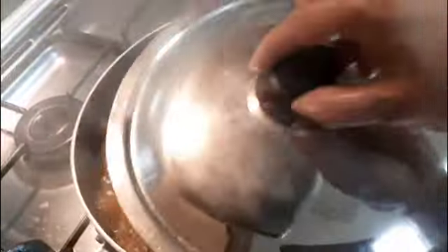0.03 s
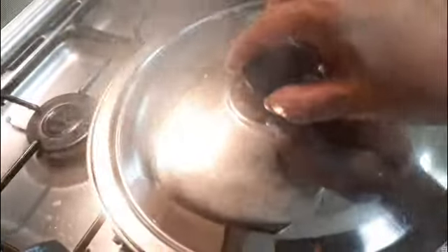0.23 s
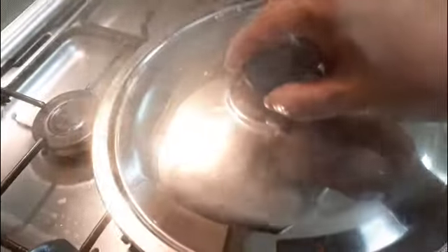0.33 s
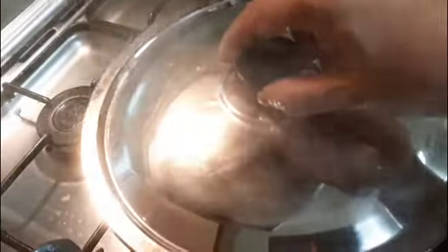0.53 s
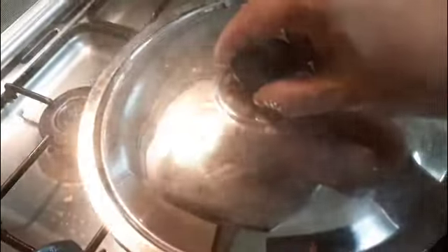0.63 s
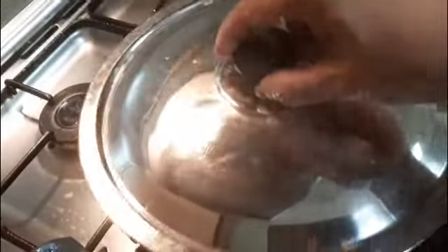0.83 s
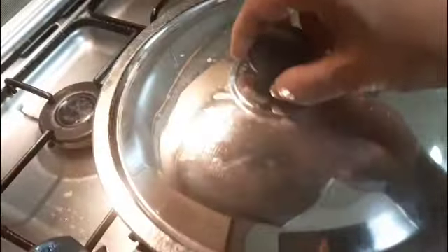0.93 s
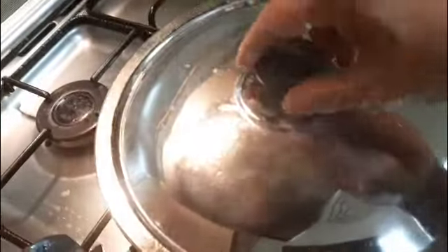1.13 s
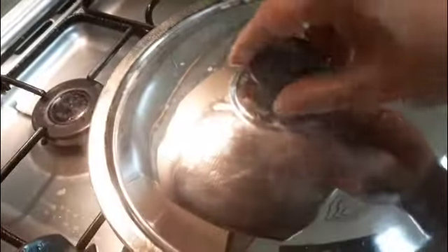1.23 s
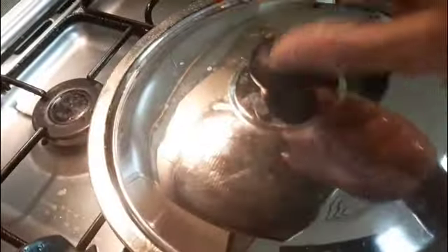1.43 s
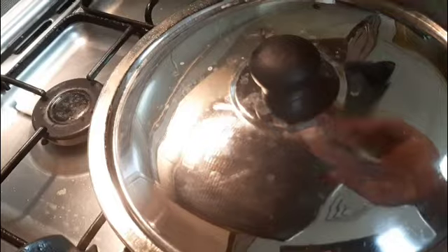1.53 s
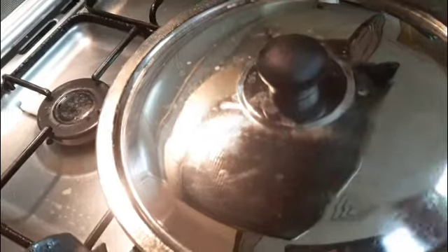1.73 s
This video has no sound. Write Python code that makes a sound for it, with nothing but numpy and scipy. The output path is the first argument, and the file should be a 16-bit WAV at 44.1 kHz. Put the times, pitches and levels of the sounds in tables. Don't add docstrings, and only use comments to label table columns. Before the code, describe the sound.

A steel-rimmed glass lid strikes a hissing, bubbling steel pot, chatters and rings briefly, muffling the hiss; after faint rubs it slides home with a lighter clank. Small kitchen, close stereo microphone, low room hum.

```python
import sys
import numpy as np
from scipy import signal
from scipy.fft import rfft, irfft, next_fast_len
from scipy.io import wavfile

SR = 44100
rng = np.random.default_rng(int(sys.argv[2]) if len(sys.argv) > 2 else 0)


def voltage_ratio(level):
    return 10 ** (np.asarray(level, float) / 20)


def store_wav(level_fs):
    pcm = np.round(np.clip(np.atleast_2d(level_fs), -1, 1) * 32767)
    wavfile.write(sys.argv[1], SR, pcm.T.astype(np.int16))


N = 79380


def rms_one(x):
    return x / np.sqrt(np.mean(x ** 2) + 1e-20)


def in_time(rows):
    return np.interp(np.arange(N) / SR, *np.transpose(rows))


def at_hz(points, hz):
    points = np.array(points)
    return np.interp(np.log(hz), np.log(points[:, 0]), points[:, 1])


def butter(x, order, hz, kind):
    return signal.sosfilt(signal.butter(order, hz, kind, fs=SR, output="sos"), x)


def drift(rate_hz):
    r = np.exp(-2 * np.pi * rate_hz * 40 / SR)
    white = rng.standard_normal(N // 40 + 2002)
    slow = signal.lfilter([1], [1, -2 * r, r * r], white)[2000:]
    return np.interp(np.arange(N) / 40, np.arange(len(slow)), rms_one(slow))


def ring(clicks, hz, t60, pan_db=0., lead=0.):
    pole = voltage_ratio(-60 / (t60 * SR)) * np.exp(2j * np.pi * hz / SR)
    z = signal.lfilter([1], [1, -pole], clicks + 1e-18)
    ports = voltage_ratio([pan_db / 2, -pan_db / 2]) * np.exp([.5j * lead, -.5j * lead])
    return np.imag(np.outer(ports, z))


def train(s, gain):
    out = np.zeros(N)
    out[(np.asarray(s) * SR).astype(int)] = gain
    return out


# frequency in Hz, left-right likeness (1 = same).
LIKENESS = [(60, 1.0), (240, 0.97), (950, 0.29), (3770, 0.091), (15000, 0.84)]


def banded_noise(spectrum, patchy_db):
    out, together = 0, drift(3)
    edges = 22 * 2 ** np.arange(0, 9.6, .5)
    white = rng.standard_normal((2, 2, N + SR // 4))
    for k, (low, high) in enumerate(zip(edges, edges[1:])):
        mid, side = butter(white[k % 2], 2, [low, high], "band")[:, -N:]
        centre = np.sqrt(low * high)
        alike = np.clip(at_hz(LIKENESS, centre), -1, 1)
        flicker = 0.55 * together + drift(6.4)
        gain = voltage_ratio(at_hz(spectrum, centre) + patchy_db * flicker)
        out = out + gain * (np.sqrt(1 + alike) * mid + np.sqrt(1 - alike) * side * [[1], [-1]])
    return rms_one(out)


# frequency in Hz, level in dB.
HUM = [(25, -36.5), (55, 5), (320, -2.5), (720, -6), (1000, -14.5), (3000, -29.5), (7500, -32), (9000, -42),
       (15500, -27.5)]


def hum():
    return voltage_ratio(-54) * banded_noise(HUM, patchy_db=-1.5)


# frequency in Hz, level in dB.
SIZZLE = [(2500, -11), (3500, -8), (5000, 2), (7000, -9.5), (8300, -24.5), (15500, -37.5)]
# time in seconds, level in dB.
OPEN = [
    (0, -56.5),
    (.19, -58.5),
    (.5, -63.5),
    (1.8, -91.5),
]


def sizzle():
    spectrum = [(1500, -25.0)] + list(SIZZLE)
    return voltage_ratio(in_time(OPEN)) * banded_noise(spectrum, patchy_db=1.0)


# start in seconds, level in dB, pitch in Hz.
PLOPS = [
    (0.036, -39, 452),
    (0.078, -37, 804),
]
SIMMER_PER_S, SIMMER_DB = 260, -75


def simmer():
    out = 0
    for s, db, hz in PLOPS:
        push = signal.lfilter([.1], [1, -.9], train([s], voltage_ratio(db + 3.5)))
        out = out + ring(push, hz, 15.3 / hz)
    sizes = voltage_ratio(3.0 * np.minimum(rng.exponential(1, N), 2.5))
    sizes = sizes * (rng.random(N) < SIMMER_PER_S / SR)
    dealt = rng.integers(0, 12, N)
    small = 0
    for k, hz in enumerate(np.geomspace(150, 950, 12)):
        small = small + ring(sizes * (dealt == k), hz, 9.0 / hz)
    small = butter(small, 5, 1100, "low")
    return out + voltage_ratio(SIMMER_DB + 0.65 * (in_time(OPEN) + 85)) * rms_one(small)


# centre in seconds, length in seconds, level in dB, pitch in Hz, width in Hz.
RUBS = [(0.847, 0.0062, -52, 1000, 595), (0.48, 0.0092, -44, 520, 650), (0.9615, 0.038, -42, 670, 540),
        (0.962, 0.016, -45, 1840, 840), (1.03, 0.007, -39.5, 524, 120), (1.07, 0.045, -37.5, 558, 210),
        (1.052, 0.022, -40, 1296, 98), (1.057, 0.013, -42.5, 2260, 430), (1.095, 0.014, -39.5, 3140, 330),
        (0.2, 0.0016, -44, 2600, 990), (0.46, 0.0055, -35, 410, 120), (0.558, 0.043, -43, 805, 12),
        (0.99, 0.011, -49, 470, 110), (0.18, 0.023, -52, 680, 77), (0.15, 0.008, -54, 780, 93),
        (0.053, 0.016, -52, 720, 100), (0.16, 0.007, -61, 1600, 120), (0.65, 0.05, -58, 1450, 60),
        (0.717, 0.035, -59.5, 1310, 200), (0.895, 0.0042, -45, 470, 300), (0.726, 0.011, -55, 570, 150),
        (1.2, 0.0065, -39, 160, 100), (1.21, 0.03, -50, 373, 77), (0.61, .0065, -45, 420, 220)]


def rubs():
    out = 0
    for s, length, db, hz, width_hz in RUBS:
        r = np.exp(-np.pi * width_hz / SR)
        swell = np.exp(-((np.arange(N) / SR - s) / length) ** 2)
        noise = rng.standard_normal(N) * (rng.random(N) < 5000 / SR)
        for _ in range(2):
            noise = signal.lfilter([1, 0, -1], [1, -2 * r * np.cos(2 * np.pi * hz / SR), r * r], noise)
        out = out + voltage_ratio(db) * swell * noise * np.linalg.norm(swell) / np.linalg.norm(swell * noise)
    return out


# time in seconds, level in dB.
SETTLE = [
    (.2034, -110),
    (.2038, -32.5),
    (.228, -28),
    (.27, -19.5),
    (.33, -24),
    (.38, -39),
    (.46, -56),
    (.51, -47.5),
    (.66, -79.5),
]
# time in seconds, level in dB.
SLIDE = [
    (.90, -100),
    (.955, -50),
    (1.0, -61.5),
    (1.06, -62.5),
    (1.10, -38),
    (1.122, -22.5),
    (1.16, -40.5),
    (1.22, -62),
    (1.32, -116),
]
TOUCHES_PER_S, TOUCH_SPREAD_DB = 5000, 1.5
SEATS_S, SLIDES_S = .25, 1.085


def lid_stage():
    return np.digitize(np.arange(N) / SR, [SEATS_S, SLIDES_S])


def rim_chatter():
    sizes = voltage_ratio(TOUCH_SPREAD_DB * np.minimum(rng.exponential(1, N), 4))
    touches = rms_one(sizes * (rng.random(N) < TOUCHES_PER_S / SR))
    return touches * (voltage_ratio(in_time(SETTLE)) * (lid_stage() < 2) + voltage_ratio(in_time(SLIDE)))


# time in seconds, loss in dB per second.
GRIP = [
    (.2, 110),
    (.33, 125),
    (.42, 105),
    (.6, 65),
    (.9, 30.5),
    (1.1, 150),
    (1.19, 30),
    (1.3, 0),
    (1.5, 0),
]


def grip_loss():
    return voltage_ratio(-np.cumsum(np.clip(in_time(GRIP), 0, 300)) / SR)


# start in seconds, ring level in dB, thud level in dB.
BLOWS = [(0.204, -5.5, -26.5), (0.2303, -7, -33), (0.2392, -5.5, -32), (0.254, -7.5, -28.5),
         (0.272, -10, -32.5), (0.2925, -12, -25), (0.301, -10, -29.5), (0.316, -13.5, -36),
         (0.335, -16, -34), (0.499, -44, -27), (1.027, -48.5, -39.5), (1.0515, -39.5, -43),
         (1.0914, -35, -30), (1.1054, -23.5, -20.5), (1.118, -20.5, -16.5), (1.1215, -16.5, -23.5),
         (1.132, -23.5, -23.5), (1.143, -23.5, -21)]
BLOW_S, RING_DB, THUD_DB = np.transpose(BLOWS)
BLOW_CUT_HZ, BLOW_SPREAD_DB = 7000, 3


def uneven_blows(level_db):
    luck = rng.standard_normal((2, len(BLOW_S)))
    return train(BLOW_S, np.sign(luck[1]) * voltage_ratio(level_db + BLOW_SPREAD_DB * luck[0]))


def drive(hz, share, chatter, loss):
    blows = uneven_blows(RING_DB) / (1 + (hz / BLOW_CUT_HZ) ** 2)
    return (1.56 * blows + share * chatter * rng.standard_normal(N)) / loss


# pitch in Hz, level in dB after the strike, level in dB
# as the lid seats, level in dB as it slides home, free t60 in seconds.
MODES = [(565, -38, -28, -47, .3), (628, -33, -26, -43, .25), (721, -32, -27, -36, .7),
         (742, -24, -17, -46, .45), (772, -25, -25, -50, .5), (800, -34, -28, -43, .6),
         (1190, -20, -20, -36, .85), (1217, -25, -24, -44, .9), (1250, -22, -33, -52, .6),
         (1324, -27, -30, -58, .4), (1660, -39, -38, -45, 1.7), (1725, -39, -40, -49, 1.4),
         (1897, -34, -30, -52, .6), (1493, -35, -40, -46, .3),
         (2183, -28, -30, -43, 1), (2210, -26, -28, -41, .9), (2343, -28, -27, -43, .7),
       (2365, -27, -28, -39, .85), (2402, -24, -21, -48, .4), (2560, -40, -33, -47, .8),
       (2584, -40, -34, -48, .55), (2880, -36, -29, -47, .7), (3167, -35, -28, -42, .45),
       (3365, -36, -32, -34, .33), (3397, -37, -35, -34, .36), (3644, -33, -31, -40, .4),
       (3704, -31, -29, -39, .45), (2783, -39, -34, -50, .6),
         (3973, -43, -33, -35, .25), (4030, -36, -30, -36, .3), (4395, -40, -27, -52, .4),
       (4495, -36, -23, -40, .35), (4617, -36, -27, -44, .36), (4926, -31, -30, -44, .3),
       (5170, -38, -33, -47, .28), (5399, -36, -31, -39, .33), (5646, -33, -35, -42, .28),
       (5755, -36, -32, -36, .25), (6304, -34, -38, -36, .27), (6480, -32, -36, -44, .27),
       (6971, -40, -34, -42, .3), (12042, -38, -36, -52, .2)]
# start in seconds, end in seconds.
HEARD_S = [
    (.21, .24),
    (.28, .345),
    (1.135, 1.185),
]
# frequency in Hz, left over right in dB.
LEAN = [(740, 1), (1190, 8.5), (1217, -8.5), (1700, 4.5), (2200, -6), (2400, -4.5), (3400, -1), (6000, 2.5)]
MODES_DB, MODE_CHATTER, PORT_LAG_S = -3.5, .2, 6e-5


def main_modes(chatter, loss):
    out, stage = 0, lid_stage()
    for hz, *peaks_db, t60 in MODES:
        lead = 2 * np.pi * hz * PORT_LAG_S * rng.normal(1, 1.0)
        force = drive(hz, MODE_CHATTER, chatter, loss)
        for k, peak_db in enumerate(peaks_db):
            part = loss * ring(force * (stage == k), hz, t60, at_hz(LEAN, hz), lead)
            start, end = (np.array(HEARD_S[k]) * SR).astype(int)
            out = out + voltage_ratio(MODES_DB + peak_db) * part / np.std(part[:, start:end])
    return out


# frequency in Hz, level in dB.
FINE = [(300, -36.5), (750, -11), (1000, -18), (2400, -20), (5000, -15.5), (7200, -18.5), (8500, -30.5),
        (15500, -24.5)]
FINE_DB, FINE_CYCLES, FINE_T60_S = -15, 2450, 0.19


def minor_modes(chatter, loss):
    out = 0
    for hz in np.linspace(22, 124, 200) ** 2 * rng.uniform(.99, 1.01, 200):
        t60 = min(FINE_T60_S, FINE_CYCLES / hz) * rng.uniform(.4, 0.73)
        level_db = FINE_DB + at_hz(FINE, hz) + 5 * np.log10(hz / 1e3) + rng.uniform(-5, 5)
        force = drive(hz, 0.3, chatter, loss) * voltage_ratio(level_db)
        lead = rng.normal(0, 2.0) * min(1, hz / 1500)
        out = out + ring(force, hz, t60, rng.normal(0, 3.2), lead)
    return out * loss


CRACK_DB, CRACK_T60_S, CLICK_DB = -8.5, 0.015, -1


def crack(chatter):
    fall = voltage_ratio(-60 / (CRACK_T60_S * SR))
    puff = signal.lfilter([1], [1, -fall], train(BLOW_S, voltage_ratio(RING_DB + CRACK_DB)) + 1e-18)
    click = butter(train(BLOW_S, voltage_ratio(RING_DB + CLICK_DB)) + 1e-18, 2, [1200, 6500], "band")
    return click + (puff + .5 * chatter) * banded_noise(FINE, patchy_db=2.5)


# pitch in Hz, level in dB, t60 in seconds.
HOLLOW = [
    (167, -21.5, .15),
    (235, -12.5, 0.09),
    (397.7, -6, 0.092),
    (452, -3.5, 0.16),
    (517, -4, 0.1),
    (714, 3.5, 0.027),
]


def thud(chatter):
    out = 0
    for hz, level_db, t60 in HOLLOW:
        push = signal.lfilter([.0036], [1, -1.88, .8836], uneven_blows(THUD_DB + level_db))
        stir = voltage_ratio(level_db - 33.5) * chatter * rng.standard_normal(N)
        out = out + butter(ring(push + stir, hz, t60, -2.9), 3, 0.65 * hz, "high")
    return out


def lid_on_pot():
    chatter, loss = rim_chatter(), grip_loss()
    metal = main_modes(chatter, loss) + minor_modes(chatter, loss) + crack(chatter)
    return butter(metal, 4, 330, "high") + thud(chatter) + rubs()


ROOM_T60_S, WALL_CUT_HZ, ROOM_DB = 0.56, 7100, -16


def kitchen(x):
    size = next_fast_len(N + SR)
    w = 2 * np.pi * np.arange(size // 2 + 1) / size
    dull = 1 / (1 + 1j * w * SR / (2 * np.pi * WALL_CUT_HZ))
    out = np.zeros((2, len(w)), complex)
    for k, lag in enumerate(rng.uniform(.009, .034, 16)):
        loop = voltage_ratio(-60 * lag / ROOM_T60_S) * dull ** (lag / .05) * np.exp(-1j * w * lag * SR)
        out[k % 2] += (-1) ** (k // 2) * loop / (1 - loop)
    low_cut = 1 + (2 * np.pi * 900 / SR / (w + 1e-9)) ** 2
    return irfft(out * rfft(x, size) / low_cut, size)[:, :N]


def scene():
    lid = lid_on_pot()
    return hum() + sizzle() + simmer() + lid + voltage_ratio(ROOM_DB) * kitchen(lid)


def low_pass(x):
    return signal.sosfilt(signal.butter(12, 16440, fs=SR, output="sos"), x)


MIC_DIP_HZ, MIC_DIP_WIDTH_HZ, MIC_DIP = 8450, 1900, 0.41


def record(dry):
    low, high = MIC_DIP_HZ - MIC_DIP_WIDTH_HZ / 2, MIC_DIP_HZ + MIC_DIP_WIDTH_HZ / 2
    x = dry - MIC_DIP * butter(dry, 1, [low, high], "band")
    x = 1.1 * np.tanh(x / 1.1)
    x = signal.sosfilt(signal.cheby2(12, 70, 16300, fs=SR, output="sos"), x)
    return low_pass(x)


dry = scene()
out = record(dry)
store_wav(out)
```